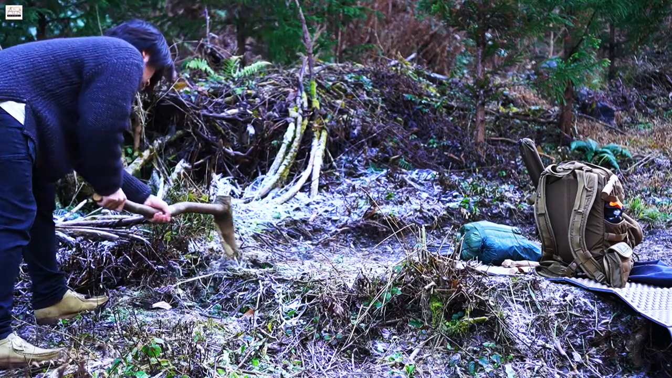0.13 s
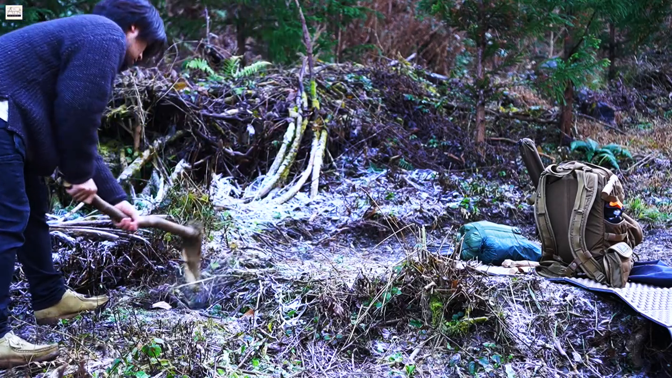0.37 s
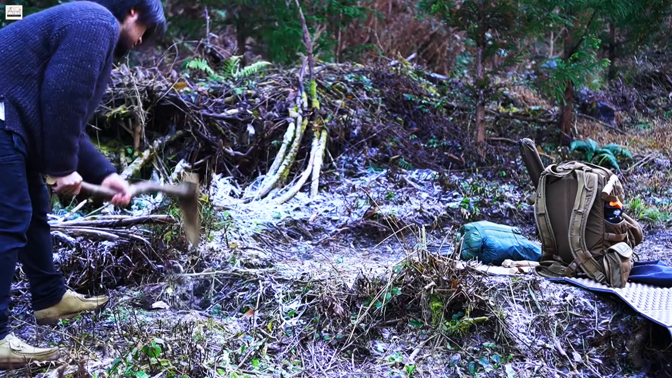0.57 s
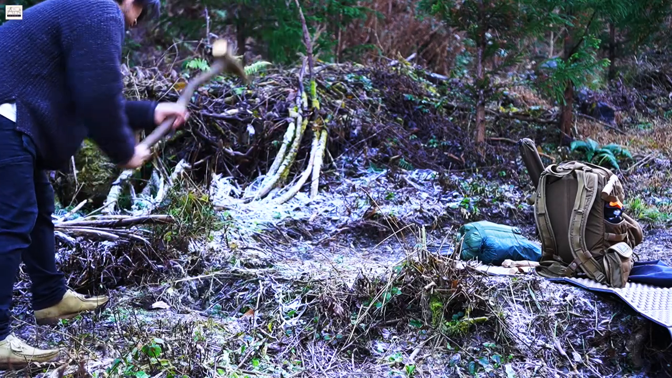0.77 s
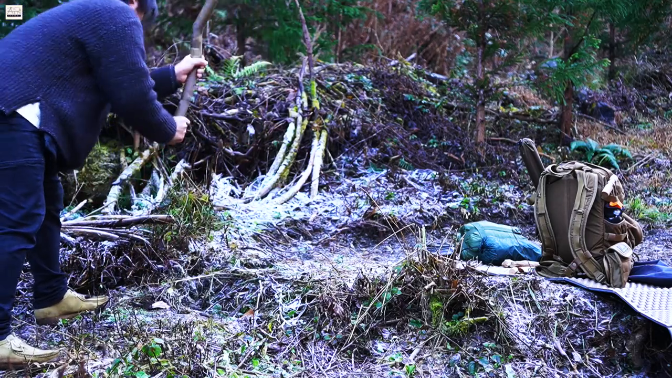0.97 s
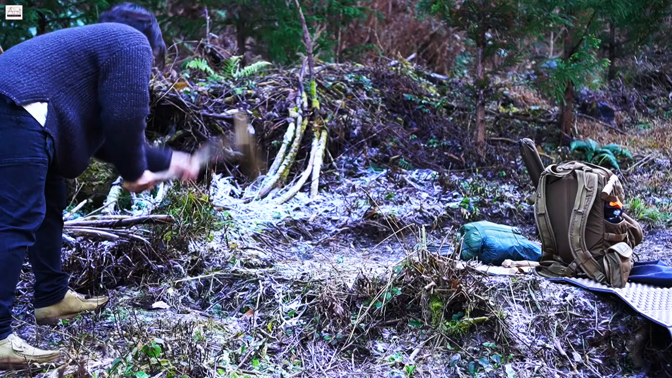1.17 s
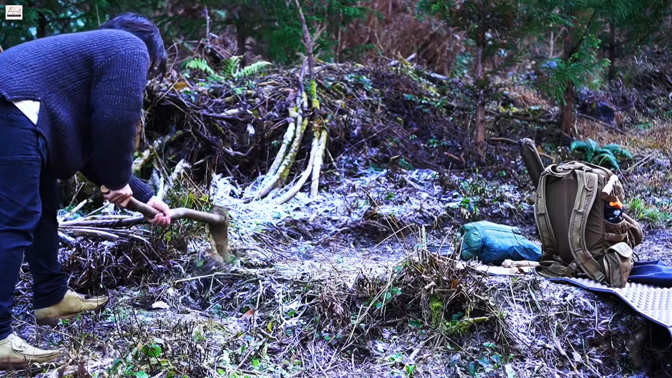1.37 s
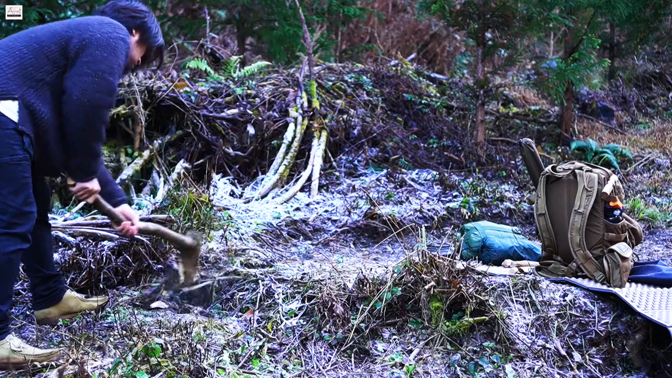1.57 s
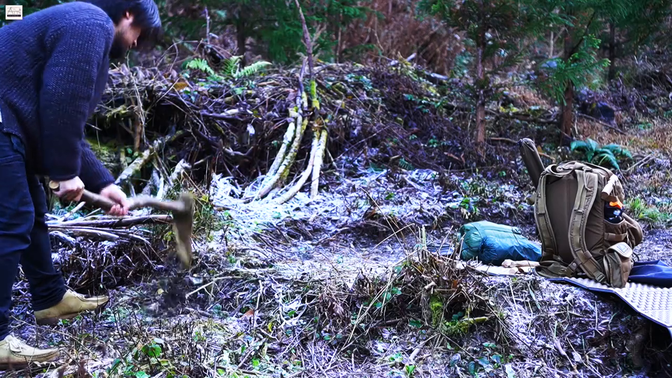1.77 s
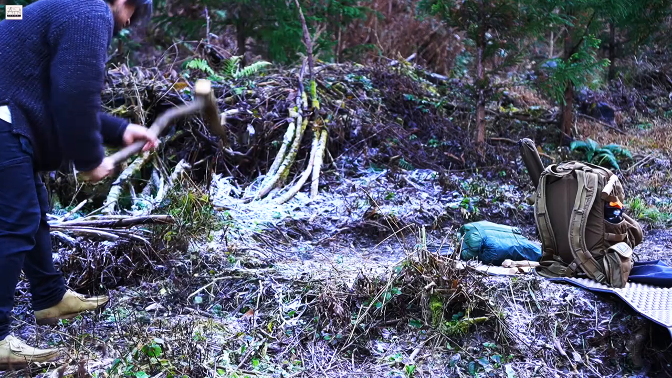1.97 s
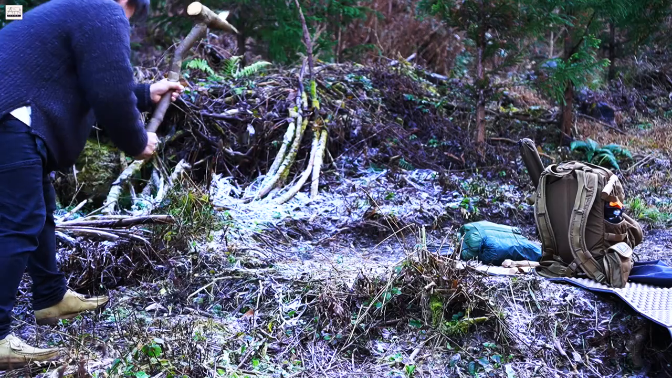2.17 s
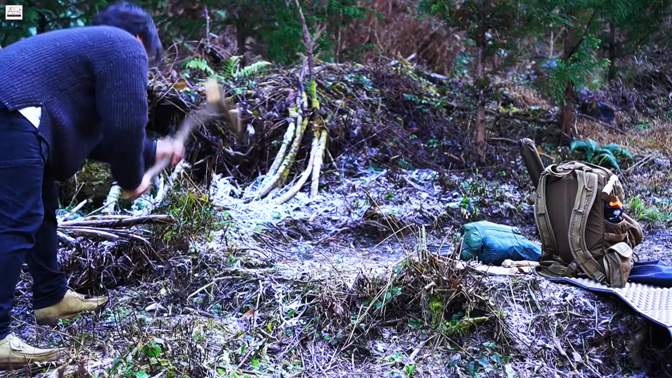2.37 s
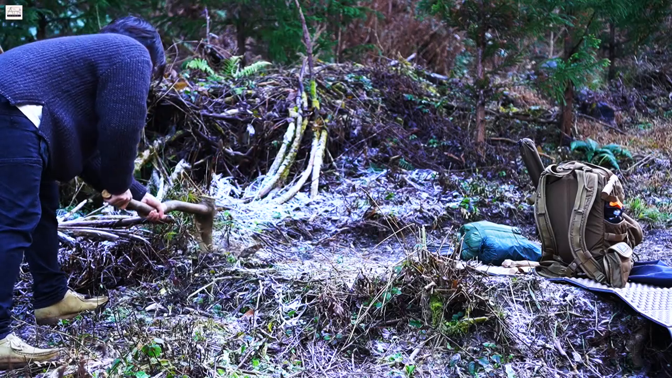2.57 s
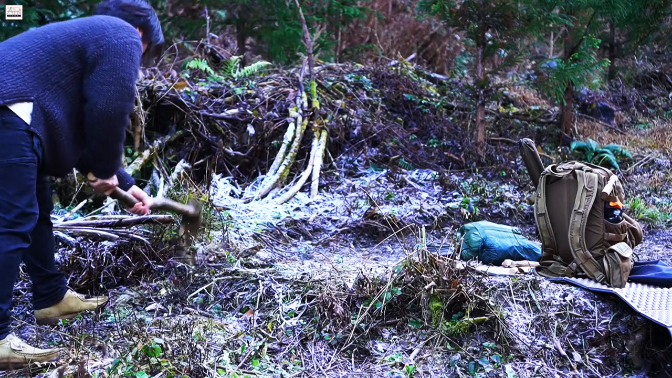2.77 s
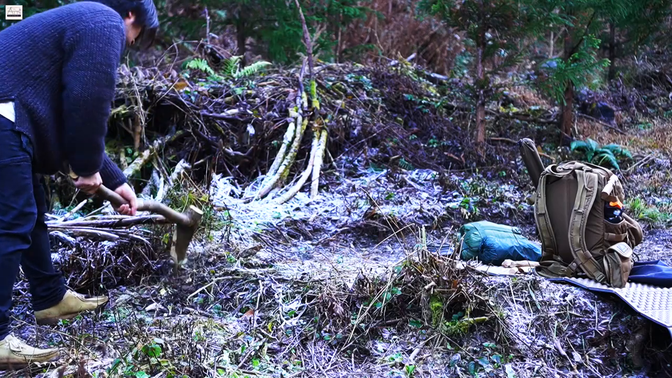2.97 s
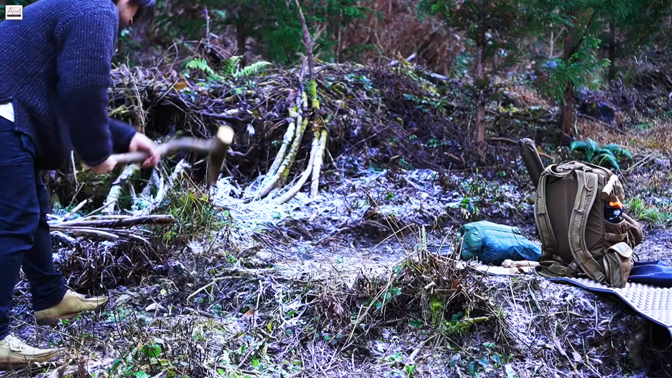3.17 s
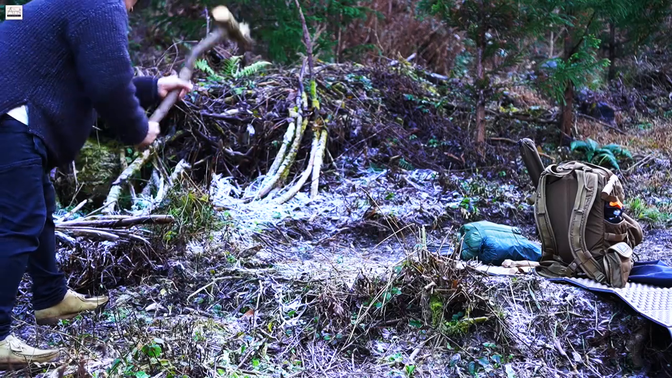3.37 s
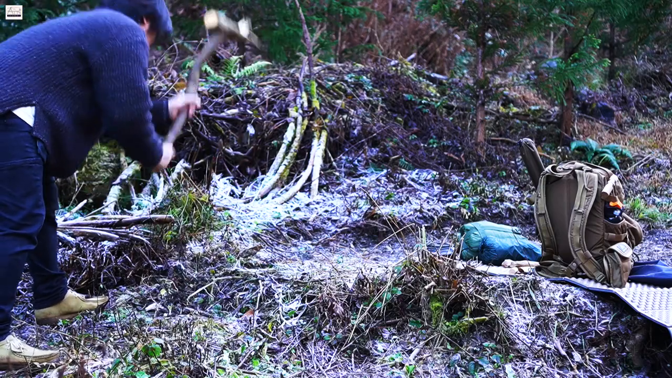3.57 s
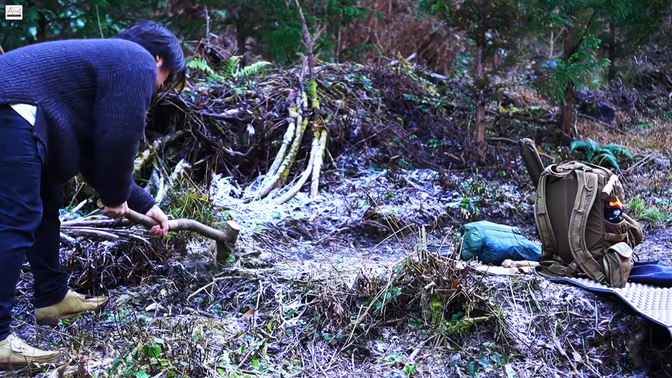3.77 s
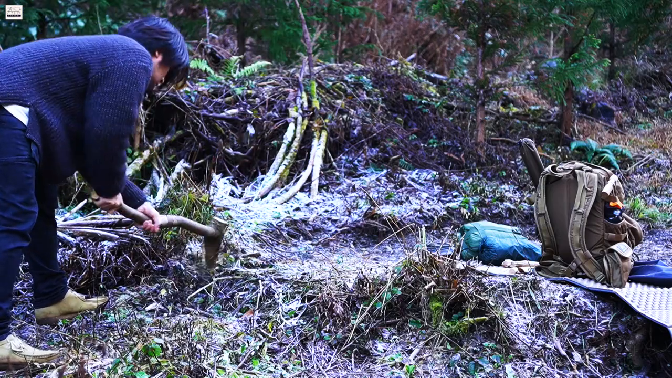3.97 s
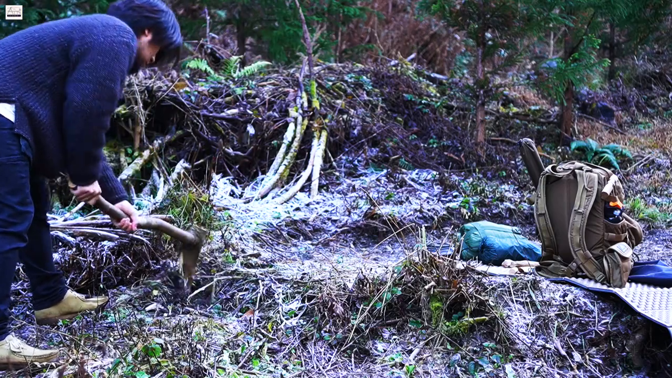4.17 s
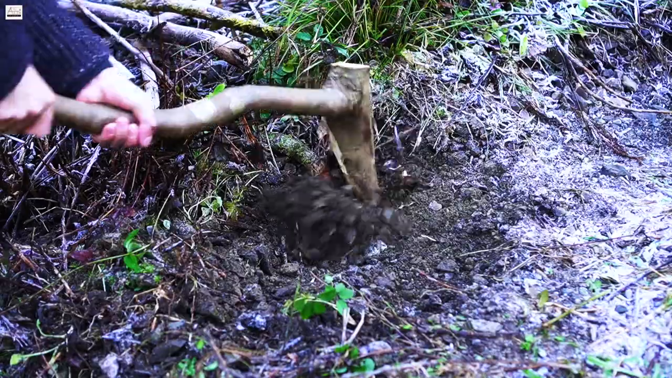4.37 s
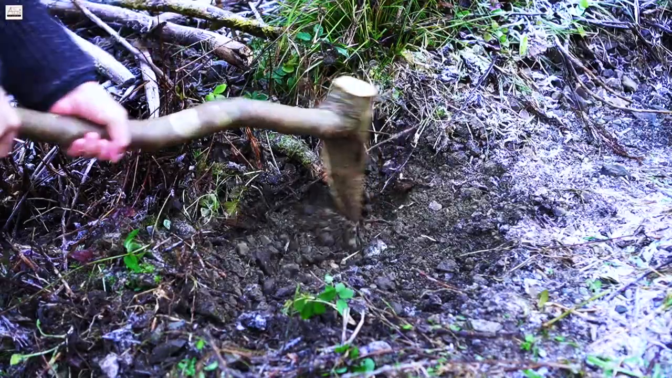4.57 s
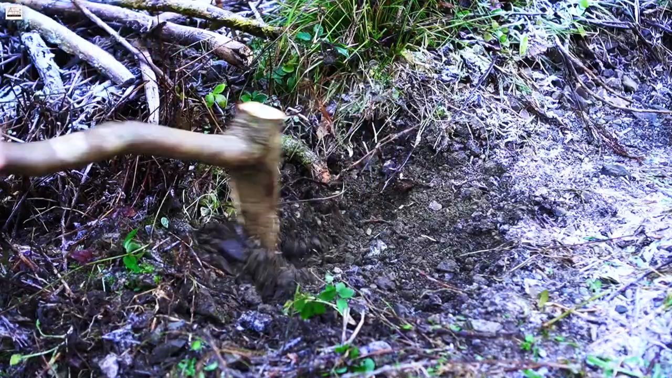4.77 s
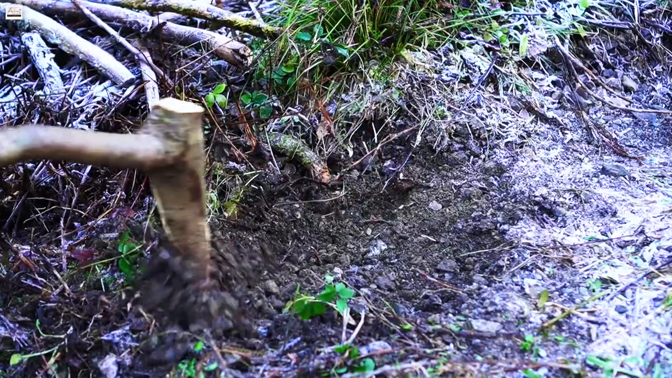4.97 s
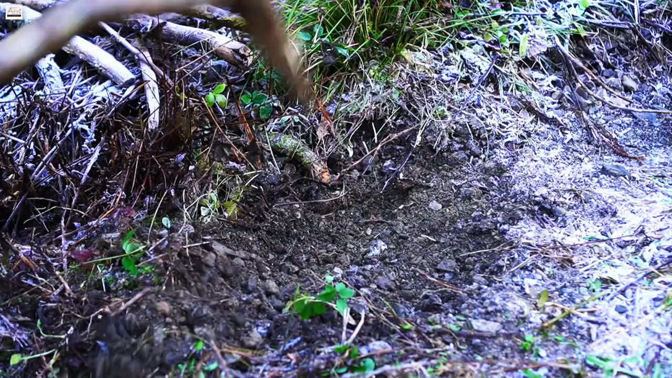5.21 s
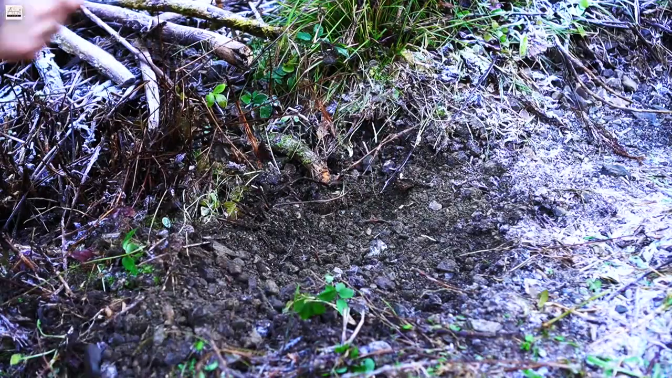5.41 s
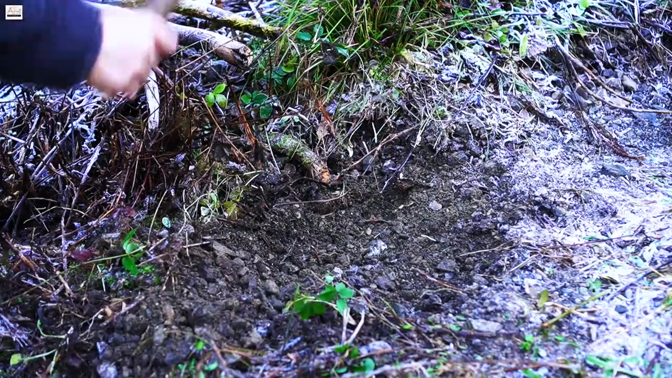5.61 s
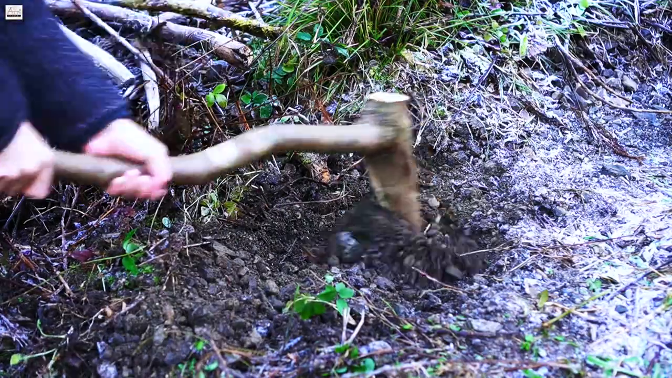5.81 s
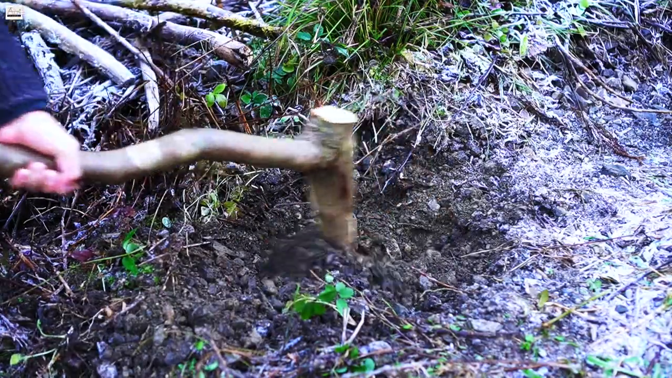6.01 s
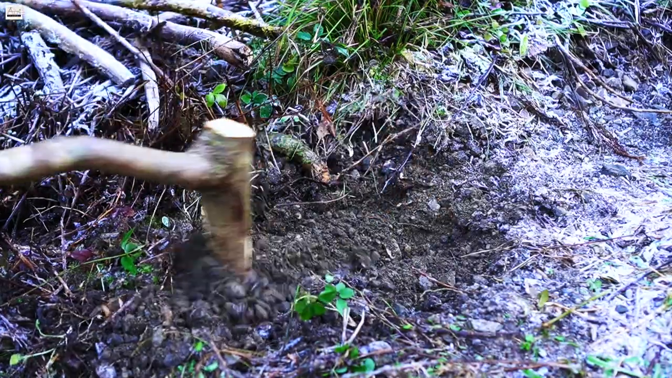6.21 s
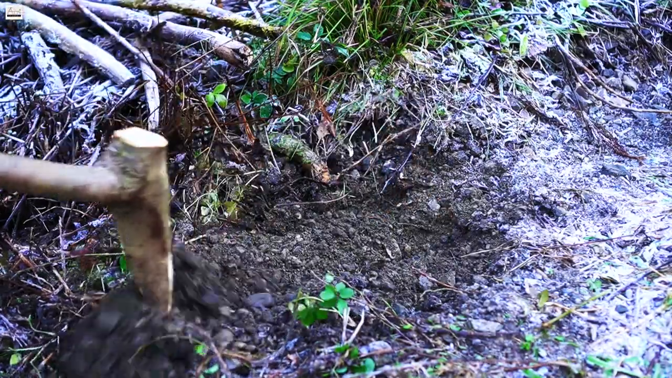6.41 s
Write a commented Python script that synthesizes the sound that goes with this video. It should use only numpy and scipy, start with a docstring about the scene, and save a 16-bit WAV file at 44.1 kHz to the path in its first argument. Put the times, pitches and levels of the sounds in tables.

```python
"""A wooden hoe chops into frosted forest soil six times: short noise bursts are the cracking crust and
scattering rubble, ringing tones the wood, dying sines the soil thuds. The blade then drags crumbling earth,
made of many tiny ringing grains and single snaps. Jolts through the ground shake the microphone's stand,
heard as low, slowly swelling tones. After the fourth blow the microphone stands closer.
Filtered noise gives the far hiss and rumble in the gaps."""
import sys
import numpy as np
from scipy import signal
from scipy.fft import rfft, irfft, next_fast_len
from scipy.io import wavfile

SR = 44100
rng = np.random.default_rng(int(sys.argv[2]) if len(sys.argv) > 2 else 0)


def persist_wave(psi):
    """Save psi, clipped to +-1, as 16-bit WAV."""
    counts = np.round(np.clip(psi, -1, 1) * 32767).astype(np.int16)
    wavfile.write(sys.argv[1], SR, np.atleast_2d(counts).T)


N = 284445   # length in samples


def from_db(db):
    """Turn decibels into a gain."""
    return 10 ** (np.asarray(db) / 20)


def rms_one(x):
    """Scale to an average strength (rms) of 1."""
    return x / np.sqrt(np.mean(x ** 2) + 1e-20)


def peak_one(x):
    """Scale so the highest peak is 1."""
    return x / np.max(np.abs(x))


def band(x, low_hz, high_hz, order=2):
    """Keep the pitches between two limits (Butterworth band-pass)."""
    top_hz = min(high_hz, .45 * SR)
    return signal.sosfilt(signal.butter(order, [low_hz, top_hz], "band", fs=SR, output="sos"), x)


def colour(x, spectrum):
    """Shape a sound by (f/Hz, level/dB) points joined on a log pitch axis."""
    size = next_fast_len(N)
    hz = np.maximum(np.arange(size // 2 + 1) * SR / size, 1)
    point_hz, point_db = np.array(spectrum).T
    gain = from_db(np.interp(np.log(hz), np.log(point_hz), point_db))
    return irfft(rfft(x, size) * gain, size)[:N]


def drift(rate):
    """Wander slowly by chance, with rms 1; a higher rate (Hz) wanders faster."""
    step = 40   # samples between the points of the slow curve
    r = np.exp(-2 * np.pi * rate * step / SR)
    noise = rng.standard_normal(N // step + 2002)
    slow = signal.lfilter([1], [1, -2 * r, r * r], noise)[2000:]   # skip the settling of the filter
    return np.interp(np.arange(N) / step, np.arange(len(slow)), rms_one(slow))


def ring(clicks, hz, t60):
    """Each unit click sets off a sine of height 1 that falls by 60 dB in t60 seconds."""
    r = from_db(-60 / (t60 * SR))
    w = 2 * np.pi * hz / SR
    return signal.lfilter([0, np.sin(w)], [1, -2 * r * np.cos(w), r * r], clicks + 1e-18)


def burst(noise, t60, rise, spike):
    """A break: noise that swells, spikes as the piece gives way, and dies."""
    rise = max(rise, .0001)
    t = np.arange(len(noise)) / SR - rise
    swell = np.minimum(1 + t / rise, 1)
    decay = from_db(-60 * np.maximum(t, 0) / max(t60, .003))
    return noise * swell * decay * (1 + spike * np.exp(-np.abs(t) / 0.0006))


def about(x, hz, spread, wide_db):
    """Strongest about a centre pitch, with a broad skirt around it; peak 1."""
    core = band(x, hz / spread, hz * spread)
    skirt = band(x, hz / 3.6, hz * 2.2, order=1)
    return peak_one(core + from_db(wide_db) * skirt)


QUIET_DB = -52
MOVED_S = 4.35   # the microphone is closer from here on
RUMBLE_DROP_DB = -11.5   # the rumble is weaker at the closer spot
# tone of the far hiss and rumble: f/Hz, relative level/dB (per Hz)
QUIET_TONE = [(15, -46), (25, -14), (49, -1.5), (107, -4.5), (233, -15), (267, -20), (340, -17), (433, -22),
              (509, -15), (722, -17), (1110, -11.5), (1240, -17), (1710, -23), (10400, -25), (12500, -38.5),
              (15900, -32)]


def forest():
    """Far hiss and rumble: shaped noise, wavering a little."""
    noise = rms_one(colour(rng.standard_normal(N), QUIET_TONE))
    air = from_db(QUIET_DB + 0.46 * drift(1.0)) * noise
    rumble = signal.sosfiltfilt(signal.butter(2, 170, fs=SR, output="sos"), air)
    closer = np.arange(N) > MOVED_S * SR
    return air - rumble * (1 - from_db(RUMBLE_DROP_DB)) * closer


# crust breaking under a blow, before filtering:
# t/s, peak level/dB, centre f/Hz, 60 dB decay time/s, wood knock level/dB
CRUST_CRACKS = [(.026, 1.5, 1540, 0.024, -14), (.0295, -8, 4000, 0.015, -22),
                (0.0321, -1, 6800, 0.016, -36), (0.034, -15, 2460, .011, -14.5),
                (1.302, -22, 5000, .058, -43), (1.305, -4, 7300, 0.014, -7),
                (1.3083, 5.5, 2770, 0.0096, -17), (1.3112, 0.5, 1940, 0.031, -15),
                (1.3142, -2, 9000, 0.018, -6), (1.3177, -8, 8100, 0.043, -11),
                (2.5303, -14, 2920, 0.07, -43), (2.5351, -11.5, 7960, 0.027, -14),
                (2.538, -1.5, 5800, 0.016, -20), (2.542, 1.5, 2620, 0.011, -29),
                (2.545, -24, 4600, .03, -9.5), (3.809, -8, 5560, 0.0075, -22),
                (3.8131, -2.5, 1340, 0.036, -2), (3.821, -27, 3000, 0.066, -23),
                (3.828, -22, 2480, .03, -24), (3.833, -22, 4500, .02, -30), (4.3688, -8, 7100, 0.014, -30),
                (4.3698, -26.5, 1180, .015, -12), (4.373, 2, 2500, 0.019, -12),
                (4.377, -2, 5000, 0.031, -6), (4.38, 0.5, 2480, 0.0097, -36),
                (4.384, -11, 2000, 0.034, -16), (5.8252, -7, 5000, 0.0072, -22),
                (5.8265, 1, 2200, 0.044, -12)]


def crust_cracks(size=8000):
    """Frozen crust breaks in short noise bursts, each strongest about its own pitch."""
    out = np.zeros(N + size)
    noises = rng.standard_normal((len(CRUST_CRACKS), size))
    for (s, peak_db, hz, t60, _), noise in zip(CRUST_CRACKS, noises):
        i = round(s * SR)
        crack = burst(noise, t60, rise=0.000464, spike=0.38)
        out[i:i + size] += from_db(peak_db) * about(crack, hz, spread=1.24, wide_db=4.5)
    return out[:N]


# ringing tones (modes) of the wooden hoe: f/Hz, relative level/dB, 60 dB decay time/s
HOE_MODES = [(331, 5, 0.012), (655, -4.5, 0.042), (1391, -3, 0.027), (1800, -22, 0.029), (2360, -1, 0.0085),
             (2340, -7, 0.011), (2917, 0, 0.021), (4600, -8, 0.037)]


def wood_knocks():
    """Each crack rings the hoe, most of all in the modes nearest the crack's own pitch."""
    crack_s, _, crack_hz, _, knock_db = np.transpose(CRUST_CRACKS)
    at = np.round(crack_s * SR).astype(int)
    out = np.zeros(N)
    for hz, db, t60 in HOE_MODES:
        octaves_away = np.abs(np.log2(hz / crack_hz))
        knocks = np.zeros(N)
        knocks[at] = from_db(knock_db + db - 6.2 * octaves_away)
        out += ring(knocks, hz, t60)
    return out


THUD_T60_S, RUBBLE_AFTER_S, RUBBLE_T60_S = 0.025, 0.011, 0.15
# each blow, before filtering: t/s, soil thud level/dB, thud f/Hz, rubble level/dB, rubble f/Hz
HOE_BLOWS = [(.028, -26, 468, -19.5, 7900), (1.308, -10.5, 317, -20.5, 1780), (2.54, -26.5, 313, -26, 3120),
             (3.814, -38, 666, -23, 1500), (4.375, -10, 590, -37, 6000), (5.826, -10, 295, -27, 3460)]


def soil_thuds(size=8000):
    """The soil answers each blow with a short, quickly dying sine."""
    out = np.zeros(N + size)
    t = np.arange(size) / SR
    for s, db, hz, _, _ in HOE_BLOWS:
        i = round(s * SR)
        envelope = from_db(db - 60 * t / THUD_T60_S) * np.minimum(t / 0.0014, 1)
        out[i:i + size] += envelope * np.sin(2 * np.pi * hz * t)
    return out[:N]


def rubble(size=8000):
    """Broken bits scatter just after each blow: a longer, broader burst of noise."""
    out = np.zeros(N + size)
    noises = rng.standard_normal((len(HOE_BLOWS), size))
    for (s, _, _, db, hz), noise in zip(HOE_BLOWS, noises):
        i = round((s + RUBBLE_AFTER_S) * SR)
        scatter = burst(noise, RUBBLE_T60_S, rise=0.0018, spike=0.43)
        out[i:i + size] += from_db(db) * about(scatter, hz, spread=1.36, wide_db=8.0)
    return out[:N]


def blows():
    """Cracks, knocks and rubble stay thin and bright; the soil thuds keep their bass."""
    bright = crust_cracks() + wood_knocks() + rubble()
    # keep cracks, knocks and rubble thin and bright, with little bass
    bright = signal.sosfilt(signal.butter(2, 350, "high", fs=SR, output="sos"), bright)
    return bright + soil_thuds()


# earth on the move, one list a stroke: t/s, frost grit level/dB, coarseness/dB (lumps over grit)
DRAG_STROKES = [
    [(.045, -48.5, -5.5), (.195, -42.5, -6), (.319, -37, -12), (.389, -33.5, -7.5), (.519, -44, -7),
     (.56, -50.5, -12), (.8, -66, -6)],
    [(1.335, -37, -15), (1.363, -44, -8), (1.477, -46.5, -1), (1.531, -39.5, -4), (1.603, -31, -6),
     (1.655, -39, -1), (1.745, -49, -6.5), (1.87, -46, -12.5), (1.925, -54.5, -13), (2.089, -61, -7),
     (2.5, -59, 0)],
    [(2.56, -46, -17), (2.594, -47.5, -6.5), (2.704, -48.5, -7), (2.786, -42.5, -8.5), (2.904, -36, -9.5),
     (2.964, -43, -10.5), (3.056, -42.5, -14), (3.154, -60, -13), (3.3, -74, -2)],
    [(3.845, -54, 2), (3.965, -57.5, 4.5), (4.035, -48.5, 0), (4.075, -44.5, 2), (4.125, -40, -6),
     (4.19, -38.5, -5), (4.24, -44, 0), (4.276, -50, -3), (4.365, -51, -6)],
    [(4.395, -47, -2), (4.443, -33.5, -6.5), (4.567, -44.5, -4.5), (4.685, -38, 3.5), (4.803, -36, -2),
     (4.859, -39, 1), (4.909, -33.5, -0.5), (4.997, -35.5, -3.5), (5.06, -44, -1.5), (5.104, -48.5, -6),
     (5.228, -44, -17.5), (5.408, -45.5, -8), (5.578, -51, -8.5), (5.815, -49, -5.5)],
    [(5.845, -50, -2), (5.883, -42.5, 2), (5.997, -38.5, 5), (6.057, -38.5, -1.5), (6.183, -39.5, 4.5),
     (6.313, -35.5, -2.5), (6.4, -34, -4), (6.45, -43.5, -2)],
]


def drag():
    """Grit level and coarseness in time; next to nothing while the hoe is in the air."""
    t = np.arange(N) / SR
    grit_db, coarse_db = np.full(N, -120.), np.zeros(N)
    for rows in DRAG_STROKES:
        s, grit, coarse = np.transpose(rows)
        moving = (t >= s[0] - .01) & (t <= s[-1] + .01)
        grit_db[moving] = np.interp(t[moving], s, grit)
        coarse_db[moving] = np.interp(t[moving], s, coarse)
    return grit_db, coarse_db


def grains(low_hz, high_hz, per_s, uneven_db, cycles, clump, count=9):
    """Random grains of uneven size, in clumps, each ringing a few cycles at one of several pitches."""
    strength = from_db(uneven_db * np.minimum(rng.exponential(1, N), 5)) * rng.choice([-1, 1], N)
    born = rng.random(N) < per_s * clump / SR
    dealt = rng.integers(0, count, N)   # which pitch each grain gets
    rung = np.zeros(N)
    for k, hz in enumerate(np.geomspace(low_hz, high_hz, count)):
        rung += ring(strength * born * (dealt == k), hz, cycles / hz) * hz / low_hz
    return band(rung, low_hz, high_hz, order=3)


# tone of the moving earth: f/Hz, relative level/dB (per Hz)
EARTH_TONE = [(88, -46), (150, -16.5), (253, -7.5), (339, -12), (736, -4), (877, -9.5), (1370, -4),
              (3690, -12.5), (4390, -10.5), (5440, -10), (6110, -4), (9000, -6), (15500, -28.5)]
# grain sizes, big to small: low f/Hz, high f/Hz, base rate/(1/s), unevenness/dB, 60 dB decay/cycles
GRAIN_SIZES = [(180, 850, 1000, 1.5, 10), (864, 2770, 1200, 2, 16), (2480, 5310, 2000, 1, 3.7),
               (5000, 17400, 6000, 2, 4.9)]
# mix of the same grain sizes: level/dB over the grit, share of the coarseness (no unit)
GRAIN_MIX = [(-6.5, 1.33), (0.5, 1.45), (0.5, 0.58), (-1, 0)]


def earth(grit_db, coarse_db):
    """All grain sizes share the stop-and-go of the blade; coarse earth favours the big ones."""
    judder = 3.0 * drift(40)
    out = np.zeros(N)
    for size, (db, share) in zip(GRAIN_SIZES, GRAIN_MIX):
        clump = from_db(judder + 2.5 * drift(30))
        crumble = rms_one(colour(grains(*size, clump), EARTH_TONE))
        out += from_db(grit_db + db + share * coarse_db) * crumble
    return out


# jolts that shake the stand: t/s, relative level/dB, extra level/dB of the upper two modes
FAR_JOLTS = [(.045, -33.5, -4), (1.325, -29, -5), (2.555, -29.5, 0.5), (3.83, -27.5, -0.5)]
NEAR_JOLTS = [(4.381, -26, -9.5), (4.725, -57, 22.5), (5.834, -24, -1), (6.07, -56.5, 26.5)]
# the stand's modes, close pairs beat: f/Hz, rise time/s, 60 dB decay time/s, relative level/dB
FAR_MODES = [(46.2, 0.027, 0.81, -2.5), (49.14, 0.026, 0.99, -5), (76.2, 0.022, 0.34, 3),
             (119, 0.0049, 0.14, -6)]
NEAR_MODES = [(43.9, 0.037, 0.61, 4), (70.2, 0.0056, 1.76, -1.5), (95.2, 0.0034, 0.36, 3.5),
              (104.2, 0.004, 0.66, -2)]


def stand(jolts, modes):
    """The ground wave arrives slowly, so each mode swells before it dies; neighbours start opposed."""
    out, t = np.zeros(N + SR), np.arange(SR) / SR
    for s, shake_db, upper_db in jolts:
        at = round(s * SR)
        for k, (hz, rise, t60, db) in enumerate(modes):
            swell = (1 - np.exp(-t / max(rise, .002))) ** 2
            decay = from_db(shake_db + db + upper_db * (k > 1) - 60 * t / t60)
            out[at:at + SR] += (-1) ** k * swell * decay * np.sin(2 * np.pi * hz * t)
    return out[:N] * from_db(.8 * drift(9))   # the ringing wavers a little


# chance snaps: least level over the grit, spread, and ranges of pitch and decay
SMALL_SNAP_DB, SMALL_SPREAD_DB, SMALL_RISE_S = 9.5, 2.5, 0.00048
SMALL_HZ, SMALL_T60_S = (2500, 9000), (0.0068, 0.036)


def small_snaps(grit_db, count=40):
    """Lesser snaps fall by chance wherever earth moves, somewhat above the grit."""
    when, size, pitch, length = rng.random((count, 4)).T
    moving = np.flatnonzero(grit_db > -62)
    at = moving[((np.arange(count) + when) / count * len(moving)).astype(int)]   # one per equal share
    db = grit_db[at] + SMALL_SNAP_DB - SMALL_SPREAD_DB * np.log(1 - size)
    hz = SMALL_HZ[0] * (SMALL_HZ[1] / SMALL_HZ[0]) ** pitch
    t60 = SMALL_T60_S[0] * (SMALL_T60_S[1] / SMALL_T60_S[0]) ** length
    return list(zip(at / SR, db, hz, t60, np.full(count, SMALL_RISE_S)))


# a snap's broad skirt at 3 kHz; high ticks are broader than low clods
SKIRT_DB, SKIRT_DB_PER_OCTAVE = -3.5, 2
# dull body under a 3 kHz snap; it grows with coarseness, low clods need less
BODY_DB, BODY_PER_COARSE, BODY_DB_PER_OCTAVE = -11, 0.98, 2
# clearest clods and twigs giving way; ticks rise fast, crunches slowly. Before body and filtering:
# t/s, peak level/dB, centre f/Hz, 60 dB decay time/s, rise time/s
CLEAR_SNAPS = [(0.1348, -10.5, 5900, 0.017, .0015), (0.152, -24.5, 1630, 0.1, 0.002),
               (.288, -24, 8500, 0.033, .0004), (0.351, -21, 7700, 0.043, .0005),
               (.3996, -26.5, 7640, 0.015, .0003), (.4106, -17.5, 7740, 0.18, 0.0028),
               (0.5298, -20.5, 8050, 0.063, 0.00041), (.6348, -28.5, 8320, 0.017, 0.0015),
               (1.502, -23.5, 2310, 0.038, 0.0061), (1.5153, -21, 5100, .012, 0.00042),
               (1.5493, -21, 1650, .021, 0.00015), (1.5597, -11.5, 1600, 0.019, 0.00056),
               (1.591, -22, 1500, 0.012, 0.0047), (1.6044, -18, 1500, 0.06, 0.00078),
               (1.614, -19.5, 2100, 0.1, 0.0018), (1.6305, -13.5, 2860, 0.046, 0.0002),
               (1.6903, -27, 1600, 0.018, 0.001), (1.7199, -20, 3440, 0.0092, 0.00034),
               (1.7377, -13, 3400, 0.016, 0.00023), (1.7563, -21, 7840, .018, .003),
               (1.7903, -30, 7590, .008, .0003), (1.8794, -22.5, 8000, 0.01, .007),
               (1.899, -20.5, 8400, 0.0062, 0.00028), (2.08, -34, 1270, .006, 0.00075),
               (2.1215, -34.5, 2870, 0.01, 0.00024), (2.7632, -20.5, 7590, 0.0079, .0004),
               (2.785, -19.5, 8260, 0.0095, 0.0003), (2.836, -32, 636, 0.066, 0.0023),
               (2.8467, -30.5, 4000, .006, 0.00037), (2.8597, -20, 3600, 0.0057, 0.00027),
               (3.029, -33.5, 3000, .008, .001), (3.201, -31.5, 8100, 0.035, 0.0008),
               (3.569, -35.5, 10000, .04, 0.00046), (3.9752, -20.5, 8100, .017, 0.00073),
               (4.024, -27.5, 2700, .032, .004), (4.051, -29, 1390, 0.024, 0.0024),
               (4.063, -28.5, 1410, 0.15, .006), (4.0812, -19.5, 4380, 0.033, .0004),
               (4.15, -30, 6240, 0.014, 0.00027), (4.193, -19, 6860, 0.039, 0.0068),
               (4.217, -22, 6930, 0.0093, .0017), (4.226, -29.5, 1270, .047, 0.0041),
               (4.2878, -24, 7640, 0.0077, .0003), (4.32, -22.5, 6400, 0.12, .0044),
               (4.417, -21.5, 3000, 0.079, .0005), (4.4403, -13, 7450, 0.11, .0015),
               (4.5271, -8.5, 7500, 0.012, 0.00015), (4.535, -15.5, 9120, 0.0056, 0.00015),
               (4.573, -19.5, 5650, 0.017, 0.00018), (4.6298, -18.5, 1980, 0.028, 0.0028),
               (4.6458, -19, 1450, .024, 0.0016), (4.6675, -15.5, 3960, 0.071, .013),
               (4.7215, -7, 4050, 0.04, 0.0027), (4.7322, -4.5, 7100, 0.019, 0.00062),
               (4.754, -6, 4500, 0.043, 0.0093), (4.8318, -15, 8400, 0.014, 0.00038),
               (4.868, -25.5, 1140, 0.015, 0.0016), (4.911, -20, 2500, 0.085, 0.0014),
               (4.9268, -22, 2450, 0.079, 0.00065), (4.9806, -13.5, 6430, .026, 0.0054),
               (5.0166, -17, 5030, 0.025, 0.0022), (5.0415, -18, 6300, 0.028, 0.00086),
               (5.132, -28, 9000, .0077, .0003), (5.1472, -25, 8500, 0.0064, 0.00026),
               (5.1608, -16.5, 7650, 0.019, 0.00025), (5.1718, -19, 8360, 0.0032, 0.00024),
               (5.1865, -23, 7500, .015, 0.00055), (5.216, -30, 7590, .012, .0003),
               (5.2275, -19, 9120, 0.0054, .0003), (5.236, -24, 6500, 0.011, 0.00073),
               (5.256, -27, 6930, .008, 0.0018), (5.2694, -21, 9120, 0.023, 0.0026),
               (5.3038, -23, 6270, 0.017, 0.0012), (5.3672, -25, 2480, 0.0061, .0003),
               (5.3802, -31, 2470, 0.013, 0.0027), (5.436, -19.5, 7000, 0.011, 0.00015),
               (5.448, -20, 9450, 0.019, 0.0018), (5.516, -31, 3800, .007, 0.00025),
               (5.534, -28, 2840, .015, 0.00042), (5.8709, -22.5, 1320, 0.074, 0.00068),
               (5.896, -19, 1360, .034, 0.0024), (6.016, -16.5, 3370, 0.12, 0.0016),
               (6.0604, -17.5, 3680, 0.022, .0003), (6.0688, -7, 3870, 0.023, 0.0017),
               (6.0826, -7.5, 3360, 0.033, 0.0025), (6.185, -20, 2770, .015, 0.0025),
               (6.2578, -16, 4800, .015, 0.00077), (6.3537, -12, 9300, 0.063, .0013),
               (6.3842, -17.5, 880, .021, 0.00029), (6.4082, -17.5, 8500, 0.042, 0.0062)]


def snaps(grit_db, coarse_db, size=5000):
    """Single clods and twigs give way: a bright crack over a dull body."""
    out, rows = np.zeros(N + size), CLEAR_SNAPS + small_snaps(grit_db)
    noises = rng.standard_normal((len(rows), size))
    for (s, peak_db, hz, t60, rise), noise in zip(rows, noises):
        i = round(s * SR)
        octaves = np.log2(hz / 3000)
        x = burst(noise, t60, rise, spike=1.0)
        crack = about(x, hz, spread=1.222, wide_db=SKIRT_DB + SKIRT_DB_PER_OCTAVE * octaves)
        body_db = BODY_DB + BODY_PER_COARSE * coarse_db[i] + BODY_DB_PER_OCTAVE * octaves
        body = from_db(body_db) * peak_one(band(x, 330, 3700))
        out[i:i + size] += from_db(peak_db) * (crack + body)
    return out[:N]


def scene():
    """One microphone on both channels; the microphone's dull treble softens the breaks."""
    quiet = forest()
    grit_db, coarse_db = drag()
    breaks = blows() + snaps(grit_db, coarse_db)
    breaks = signal.sosfilt(signal.butter(4, 10500, fs=SR, output="sos"), breaks)
    shaking = stand(FAR_JOLTS, FAR_MODES) + stand(NEAR_JOLTS, NEAR_MODES)
    mono = quiet + breaks + earth(grit_db, coarse_db) + shaking
    return np.array([mono, mono])


CUTOFF_HZ = 16200


def record(dry):
    """Peaks are clipped a little under full scale, then the top of the treble is cut."""
    clipped = np.clip(dry, -.86, .86)
    return signal.sosfilt(signal.ellip(14, .5, 100, CUTOFF_HZ, fs=SR, output="sos"), clipped)


dry = scene()
out = record(dry)
persist_wave(out)
```